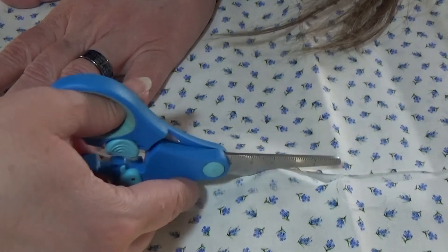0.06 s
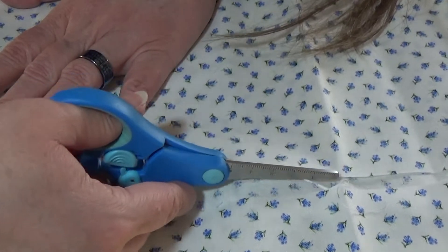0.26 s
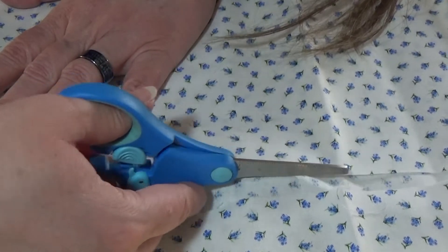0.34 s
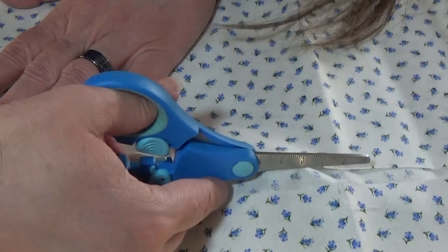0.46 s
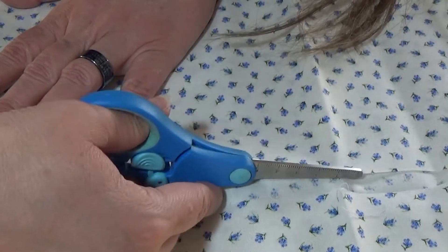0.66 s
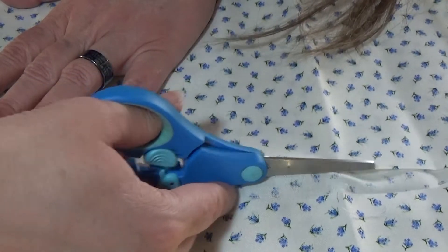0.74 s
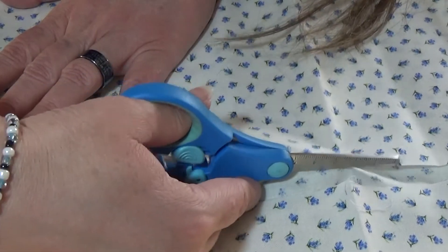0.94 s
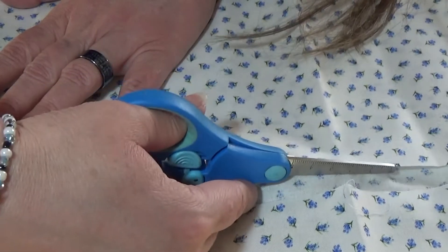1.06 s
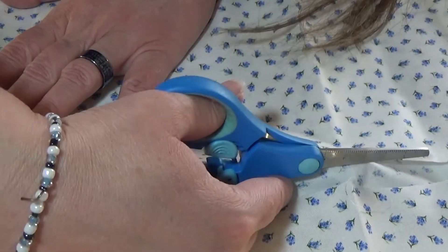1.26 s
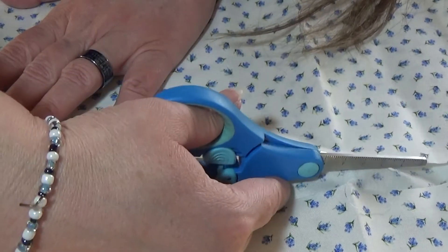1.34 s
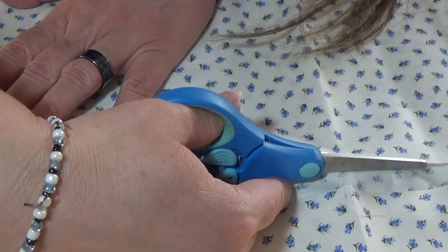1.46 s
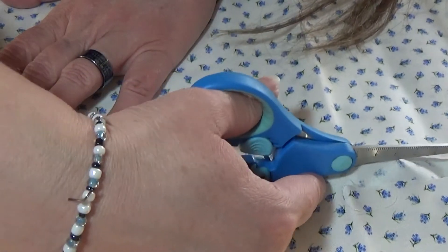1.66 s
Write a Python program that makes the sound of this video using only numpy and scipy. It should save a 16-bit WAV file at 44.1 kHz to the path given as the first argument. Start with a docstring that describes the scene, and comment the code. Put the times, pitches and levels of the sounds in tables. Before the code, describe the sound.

Four crisp, crunchy scissor snips cut thin fabric, with soft cloth rubbing and tiny ticks between

```python
"""A faint tick and the soft rub of cloth open the scene; then small plastic-handled scissors snip four
times through thin cotton on a table in a quiet room. Each closing stroke snaps threads: a dense train of
clicks that rings the modes of the blades. Ticks of the blades, loud snaps as they close and small ticks
between strokes, are decaying rings with a scrape; cloth sliding on the blades is banded noise. The table
rumbles as pushes of the hand excite its low modes, amid diffuse echoes and a steady noise floor."""
import sys
import numpy as np
from scipy import signal
from scipy.io import wavfile

SR = 44100
rng = np.random.default_rng(int(sys.argv[2]) if len(sys.argv) > 2 else 0)


def persist_wave(psi):
    """Save psi, clipped to +-1, as 16-bit WAV."""
    counts = np.round(np.clip(psi, -1, 1) * 32767).astype(np.int16)
    wavfile.write(sys.argv[1], SR, np.atleast_2d(counts).T)


N = 74970

# Noise floor of the quiet room: frequency_hz, relative_density_db (per Hz)
AIR_SPECTRUM = [(15, -38), (25, 13), (138, 3.5), (289, -7), (851, 2), (1400, -5), (2440, -7.5),
                (10100, -5.5), (13500, -25.5)]
# Rumble of the table top under the hand: time_s, level_db
TABLE_LOAD = [(0, -64.5), (.05, -61), (.184, -71), (.216, -53), (.29, -51.5), (.37, -71.5), (.41, -58.5),
              (.55, -71), (.62, -46.5), (.68, -51.5), (.77, -71.5), (.79, -57.5), (.97, -69.5),
              (1.02, -52.5), (1.07, -42), (1.155, -83), (1.185, -57), (1.33, -70.5), (1.41, -52.5),
              (1.475, -49.5), (1.52, -65), (1.57, -55), (1.7, -72)]
# Low modes of the table top: frequency_hz, width_hz, relative_level_db
TABLE_MODES = [(197, 21, 6), (250.7, 42, 5.5), (388, 89, -3.5)]
# Deep thud of the table legs: time_s, level_db
LEG_THUD = [(0, -99), (.11, -70), (.17, -82), (.24, -56), (.3, -57), (.4, -79), (1.03, -70), (1.15, -86),
            (1.19, -65), (1.26, -78), (1.7, -73)]
# Cloth rubbing on blades and table while they reopen and slide on: time_s, level_db
SLIDE_LEVEL = [(0, -47), (.03, -53.5), (.12, -52), (.145, -59), (.365, -62.5), (.38, -57), (.47, -50),
               (.5, -53), (.53, -62), (.57, -57.5), (.77, -58.5), (.785, -52.5), (.87, -50), (.885, -49),
               (.9, -57.5), (.96, -60.5), (1.165, -63), (1.18, -54), (1.28, -56.5), (1.3, -60),
               (1.54, -64.5), (1.555, -52.5), (1.645, -55), (1.665, -60.5), (1.7, -57.5)]
# Spectrum of the rubbing: frequency_hz, relative_density_db (per Hz)
SLIDE_SPECTRUM = [(781, -36), (1030, 17), (1550, -11.5), (1720, 9), (2520, -0.5), (4220, 4.5), (10200, 2.5),
                  (13500, -22)]
# Modes of blades and handles: frequency_hz, width_hz, then relative level_db in each of the four
# strokes, as the grip shifts
BLADE_MODES = [(409.2, 15.4, -15, -17.5, -9.5, -15), (849, 19, -34, -15, -44, -12),
               (961, 38.4, -9.5, -3, -11, -18.5), (1745, 56, 0.5, 0, 0, -2), (2083, 53, -11, -6.5, -12, -4),
               (2845, 188, -6, -1, 0.5, 0), (3144, 133, 0, -1, 4, 0.5), (3647, 94, 0.5, -5.5, -8, -1.5),
               (4135, 143, -7, -4.5, -21, -8), (4800, 87, -30, -6, -0.5, 4), (5548, 82, -0.5, 2.5, 4, 1),
               (6180, 180, -8, -9, -7, -29), (6526, 160, -16, -17, -2, -3.5), (7190, 31, -7.5, -3, -6, -30),
               (7860, 68, -5, -2.5, -7.5, -9), (9330, 1070, -23.5, -18, -14.5, -20),
               (10480, 560, -21.5, -24, -18.5, -14.5)]
# Ticks of the blades, loud snaps as they close and small ticks between strokes:
# start_s, ring_db, pitch_hz, scrape_db, t60_s
TICKS = [(.005, -49.5, 1807, -56, 0.11), (.377, -60, 1010, -50, 0.15), (.561, -43, 3000, -41.5, 0.071),
         (.654, -20, 2130, -27.5, 0.036), (.778, -40.5, 2980, -54, 0.026), (.781, -45, 1040, -57, 0.05),
         (.833, -48.5, 1870, -51, 0.044), (0.868, -42.5, 1800, -44, 0.037),
         (1.175, -44.5, 890, -43.5, 0.064), (1.441, -20, 3060, -30, 0.0084), (1.474, -46, 3530, -77, 0.21),
         (1.548, -47.5, 1620, -48, 0.058), (1.688, -52, 1170, -64, 0.11)]
# Band of the scrape in a tick: low_hz, high_hz
SCRAPE_BAND = [970, 5950]
# Cutting force as level, one curve per closing stroke: time_s, level_db
SNIP_FORCE = [
    [(.188, -49), (.196, -26), (.208, -17), (.218, -14), (.224, -19), (.23, -12), (.236, -27), (.244, -16),
     (.252, -17), (.258, -44), (.2655, -75), (.269, -17.5), (.276, -17), (.284, -26), (.295, -65)],
    [(.572, -54.5), (.584, -19), (.591, -21.5), (.597, -22), (.61, -16), (.623, -19.5), (.629, -27.5),
     (.634, -12.5), (.642, -15), (.649, -18.5), (.655, -14.5), (.66, -25), (.672, -47)],
    [(.974, -50), (.978, -34.5), (.988, -20.5), (.998, -23), (1.012, -17.5), (1.018, -23), (1.031, -20.5),
     (1.036, -20), (1.048, -19.5), (1.06, -35.5), (1.09, -58), (1.105, -50)],
    [(1.353, -57), (1.359, -22.5), (1.376, -17.5), (1.385, -20), (1.398, -19.5), (1.403, -19.5),
     (1.408, -20), (1.413, -25), (1.422, -41), (1.428, -17.5), (1.436, -22.5), (1.44, -24), (1.445, -37),
     (1.46, -50)],
]
# Spectrum of the bare thread crackle: frequency_hz, relative_density_db (per Hz)
CRACKLE_SPECTRUM = [(600, -35), (953, -7), (1250, -18.5), (1730, 9), (2310, -19), (2950, 4), (5660, -2.5),
                    (10900, -20), (12500, -29), (15500, -36)]
# Colour along the blades, from pivot to tip: time_s, treble_db (above 7 kHz), handle_db (0.65-1.3 kHz)
STROKE_COLOUR = [(.19, 5, 4), (.21, 7.5, -9), (.25, 3.5, 1.5), (.275, 2, -2.5), (.58, 13, -0.5),
                 (.62, 4.5, -5), (.655, 0.5, -4.5), (.98, 3, 1), (1.01, 6, 1.5), (1.05, 0.5, 8),
                 (1.36, 1.5, -1), (1.41, 6, 8.5), (1.44, 3.5, 15)]
# Time for the echoes to fall by 60 dB: frequency_hz, t60_s
ROOM_DECAY = [(300, 0.23), (1000, 0.42), (2000, 0.27), (4000, 0.3), (9000, 0.2)]

AIR_DB = -68.5
THUD_HZ, THUD_WIDTH_HZ = 66.5, 8.6
SLIDE_BLADE_DB, SLIDE_PATCHY_DB = -7.5, 2.5
THREADS_PER_S, THREAD_SPREAD_DB = 4000, 3.5
OWN_SHARE = 0.69  # share of a mode's drive power that comes from its own shifted snaps
MODE_WANDER_DB, MODE_WANDER_HZ = 2.6, 50
RING_WIDTH_HZ_S = 7  # width of a tick's ring times its t60
BLADE_DB, CRACKLE_DB = -4.5, -10.5
ROOM_DB, ROOM_GAP_S = -11.5, 0.007
RING_TO_ROOM_DB = -18  # blade ring and ticks sound mostly dry; little of them reaches the echoes
SIDE_LEAN = -0.09  # negative leans right
SIDE_ROOM_DB, SIDE_AIR_DB = -5, 7.5  # relative to the side echoes and to AIR_DB
SIDE_LOW_HZ, SIDE_HIGH_HZ = 155, 2760
CUTOFF_HZ = 15800


def amp(db):
    """Decibel law: an amplitude gain is ten to the power of dB / 20."""
    return 10 ** (np.asarray(db) / 20)


def rms_one(x):
    """Power normalisation: scale to a root mean square of 1."""
    return x / np.sqrt(np.mean(x ** 2) + 1e-20)


def in_time(rows):
    """Linear interpolation: the columns after time_s become curves over all samples."""
    time_s, *columns = np.transpose(rows)
    return [np.interp(np.arange(N) / SR, time_s, column) for column in columns]


def bandpass(x, order, edges_hz):
    """Band limitation: a Butterworth filter passes what lies between two edges."""
    return signal.sosfilt(signal.butter(order, edges_hz, "band", fs=SR, output="sos"), x)


def drift(hz):
    """Low-passed chance: two equal poles smooth white noise into a slow wander of rms 1."""
    r = np.exp(-2 * np.pi * hz / SR)
    noise = rng.standard_normal(N + SR)
    settled = signal.lfilter([1], [1, -2 * r, r * r], noise)[SR:]  # the first second is dropped
    return rms_one(settled)


def resonance(x, hz, width_hz):
    """Damped resonance: a pole pair gives a peak of gain 1 at its own frequency."""
    r = np.exp(-np.pi * width_hz / SR)
    zeros = [(1 - r * r) / 2, 0, (r * r - 1) / 2]
    poles = [1, -2 * r * np.cos(2 * np.pi * hz / SR), r * r]
    return signal.lfilter(zeros, poles, x + 1e-18)


def grains(per_s, spread_db):
    """Shot noise: clicks at random instants, of random sign and uneven size, with rms 1."""
    size_db = spread_db * np.minimum(rng.exponential(1, N), 3.5)
    sizes = amp(size_db) * rng.choice([-1, 1], N)
    return rms_one(sizes * (rng.random(N) < per_s / SR))


def banded(sources, spectrum, patchy_db):
    """Spectral synthesis: half-octave bands, dealt from two sources in turn, flicker apart; rms 1."""
    out = 0
    edges = 25 * 2 ** np.arange(0, 9.6, .5)
    spectrum_hz, spectrum_db = np.transpose(spectrum)
    for k, (low, high) in enumerate(zip(edges, edges[1:])):
        log_centre = np.log(low * high) / 2
        level_db = np.interp(log_centre, np.log(spectrum_hz), spectrum_db, left=-70)
        band = bandpass(sources[k % 2], 2, [low, high])
        out = out + amp(level_db + patchy_db * drift(19.0)) * band
    return rms_one(out)


def air():
    """Stationary noise: the room's floor as two unrelated signals, for the middle and the sides."""
    return [amp(AIR_DB) * banded(rng.standard_normal((2, N)), AIR_SPECTRUM, patchy_db=2.5)
            for _ in range(2)]


def table():
    """Modal excitation: lumpy pushes of the hand drive the low modes of the table top and legs."""
    push = grains(2000, spread_db=3.5)
    top = rms_one(sum(amp(db) * resonance(push, hz, width) for hz, width, db in TABLE_MODES))
    legs = resonance(push, THUD_HZ, THUD_WIDTH_HZ)
    legs = rms_one(resonance(legs, THUD_HZ, THUD_WIDTH_HZ))  # a second pass narrows the peak
    return amp(in_time(TABLE_LOAD)[0]) * top + amp(in_time(LEG_THUD)[0]) * legs


def blades(drive):
    """Modal superposition: shaped by the drive, snaps ring every mode with a wandering strength."""
    common = grains(THREADS_PER_S, THREAD_SPREAD_DB)
    # each mode level holds until the next stroke starts
    stroke = np.searchsorted([rows[0][0] for rows in SNIP_FORCE[1:]], np.arange(N) / SR)
    out, power = 0, 0
    for k, (hz, width_hz, *stroke_db) in enumerate(BLADE_MODES):
        own = np.roll(common, 997 * (k + 1))  # the same snaps, shifted in time
        snaps = np.sqrt(1 - OWN_SHARE) * common + np.sqrt(OWN_SHARE) * own
        level_db = np.array(stroke_db)[stroke] + MODE_WANDER_DB * drift(MODE_WANDER_HZ)
        hits = (-1) ** k * drive * snaps * amp(level_db)
        out = out + resonance(hits, hz, width_hz)
        power += np.pi / SR * width_hz * amp(2 * np.mean(stroke_db))
    return out / np.sqrt(power)


def slide():
    """Friction noise: soft rubbing of cloth, faintly ringing the blades."""
    gain = amp(in_time(SLIDE_LEVEL)[0])
    rubbing = gain * banded(rng.standard_normal((2, N)), SLIDE_SPECTRUM, SLIDE_PATCHY_DB)
    return rubbing + amp(SLIDE_BLADE_DB) * blades(gain)


def ticks():
    """Exponential decay: one uneven resonance and a broad scrape die together, barely ringing the blades."""
    ring, scrape_gain = np.zeros(N), np.zeros(N)
    noise = rng.standard_normal(N)
    for start_s, ring_db, pitch_hz, scrape_db, t60_s in TICKS:
        first = int(start_s * SR)
        fall = amp(-60 * np.arange(N - first) / SR / t60_s)
        tone = rms_one(resonance(noise, pitch_hz, RING_WIDTH_HZ_S / t60_s))
        ring[first:] += amp(ring_db) * fall * tone[first:]
        scrape_gain[first:] += amp(scrape_db) * fall
    scrape = rms_one(bandpass(rng.standard_normal(N), 2, SCRAPE_BAND))
    return ring + scrape_gain * scrape + blades(scrape_gain) / 2


def snips():
    """Fracture noise: threads part under the closing blades; ringing steel and bare crackle, apart."""
    t, force = np.arange(N) / SR, 0
    for rows in SNIP_FORCE:
        closing = (t >= rows[0][0]) * (t <= rows[-1][0])
        force = force + amp(in_time(rows)[0]) * closing
    threads = [grains(THREADS_PER_S, THREAD_SPREAD_DB) for _ in range(2)]
    crackle = amp(CRACKLE_DB) * force * banded(threads, CRACKLE_SPECTRUM, patchy_db=2.5)
    ring = amp(BLADE_DB) * blades(force)
    return coloured(np.array([ring, crackle]))


def coloured(cut):
    """Time-varying filtering: treble and handle band change along each stroke."""
    treble_db, handle_db = in_time(STROKE_COLOUR)
    treble = signal.sosfilt(signal.butter(2, 7000, "high", fs=SR, output="sos"), cut)
    handle = bandpass(cut, 1, [650, 1300])
    return cut + (amp(treble_db) - 1) * treble + (amp(handle_db) - 1) * handle


def room(x):
    """Diffuse reverberation: dense echoes die by octave band, in unrelated front and side sets."""
    t, echoes = np.arange(SR // 2) / SR, 0
    decay_hz, decay_t60 = np.transpose(ROOM_DECAY)
    for hz in 125 * 2. ** np.arange(8):
        edges = [hz / np.sqrt(2), min(hz * np.sqrt(2), .45 * SR)]
        band = bandpass(rng.standard_normal((2, len(t))), 2, edges)
        t60_s = np.interp(np.log(hz), np.log(decay_hz), decay_t60)
        echoes = echoes + band * amp(-60 * t / t60_s) * (t > ROOM_GAP_S)
    response = rms_one(echoes) / np.sqrt(len(t))
    return amp(ROOM_DB) * signal.fftconvolve(x[None], response, axes=1)[:, :N]


def scene():
    """Mid-side stereo: scissors slightly right of centre; the sides add room and air, in the mids only."""
    ring, crackle = snips()
    steel = ring + ticks()
    rest = crackle + slide() + table()
    work = steel + rest
    front, sides = room(amp(RING_TO_ROOM_DB) * steel + rest)
    air_mid, air_side = air()
    side = SIDE_LEAN * work + amp(SIDE_ROOM_DB) * sides + amp(SIDE_AIR_DB) * air_side
    side = signal.sosfiltfilt(signal.butter(4, SIDE_HIGH_HZ, fs=SR, output="sos"), side)
    side = signal.sosfiltfilt(signal.butter(1, SIDE_LOW_HZ, "high", fs=SR, output="sos"), side)
    return work + front + air_mid + side * [[1], [-1]]  # left, right


def record(dry):
    """Low-pass filtering: a steep Chebyshev filter cuts the top."""
    return signal.sosfilt(signal.cheby2(12, 70, CUTOFF_HZ, fs=SR, output="sos"), dry)


dry = scene()
out = record(dry)
persist_wave(out)
```